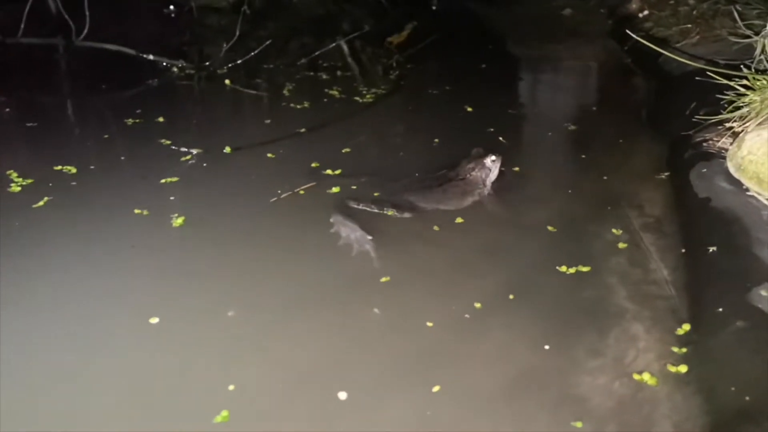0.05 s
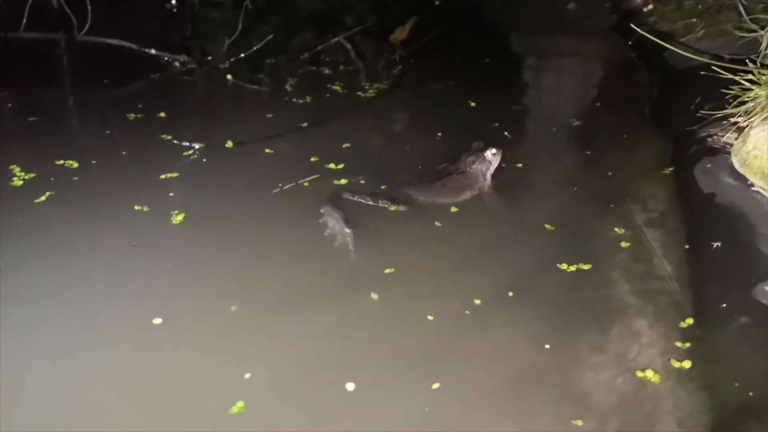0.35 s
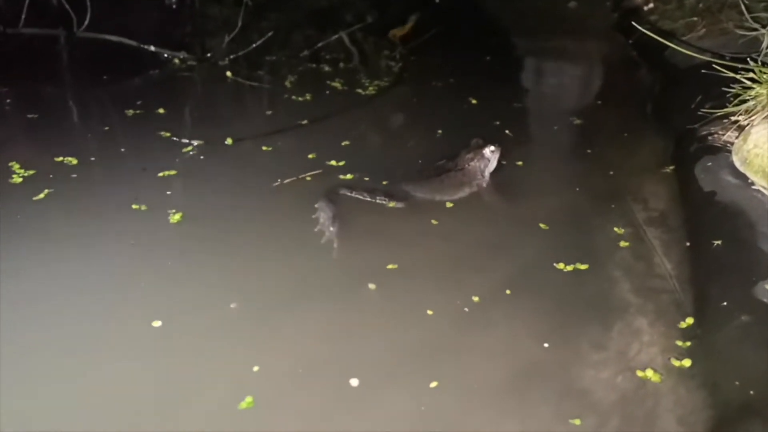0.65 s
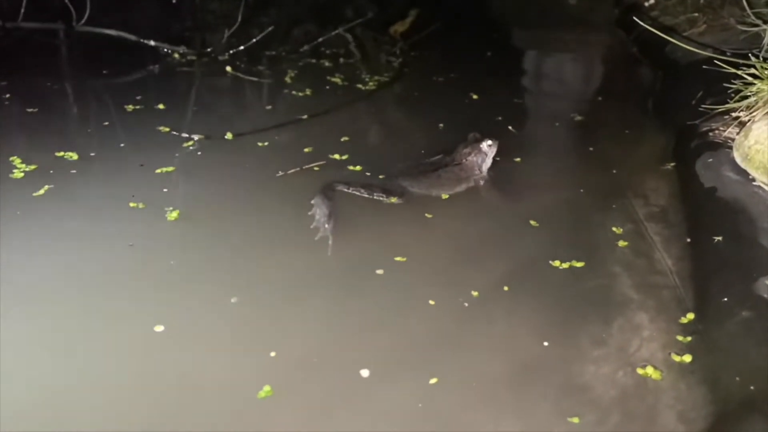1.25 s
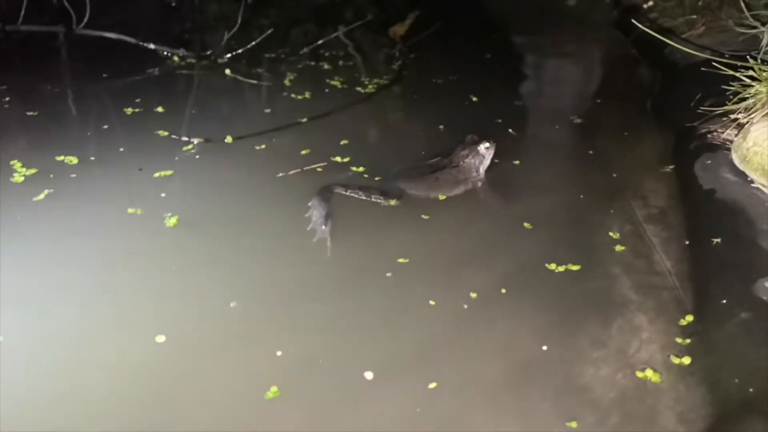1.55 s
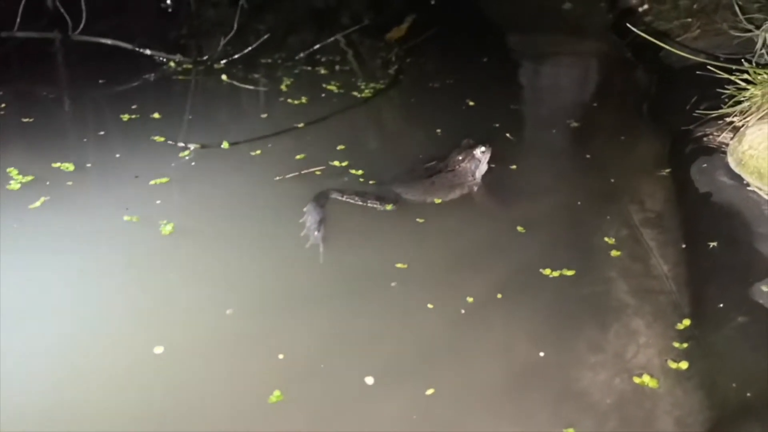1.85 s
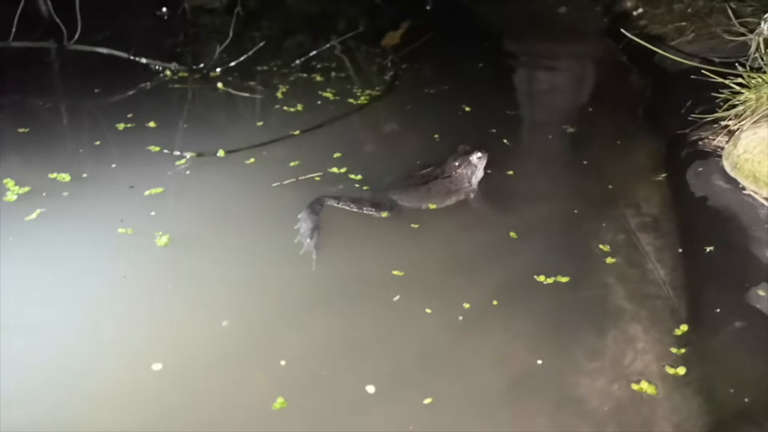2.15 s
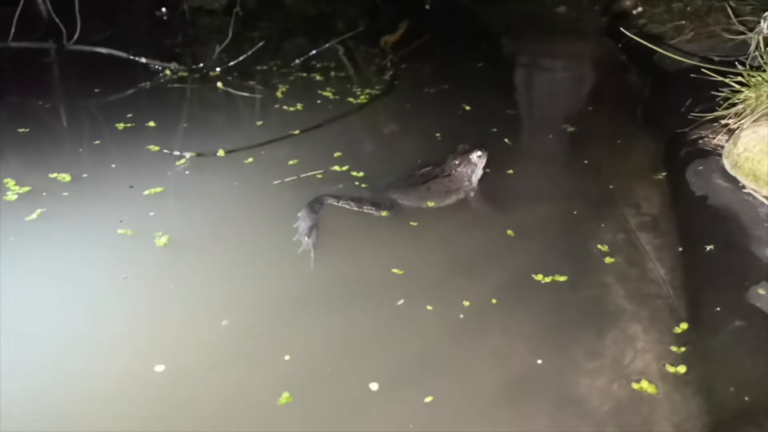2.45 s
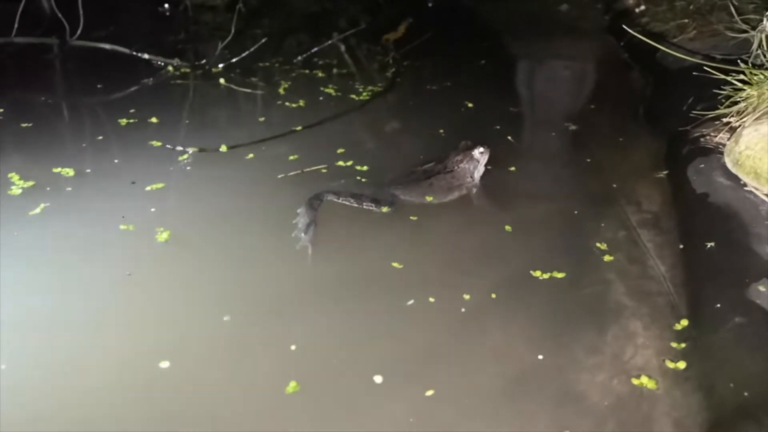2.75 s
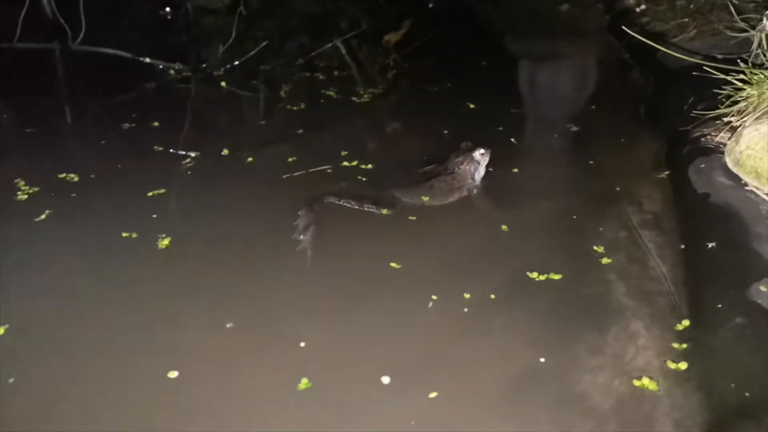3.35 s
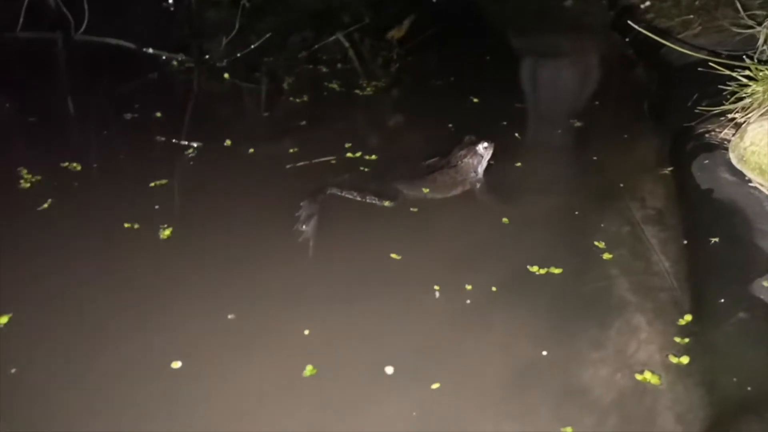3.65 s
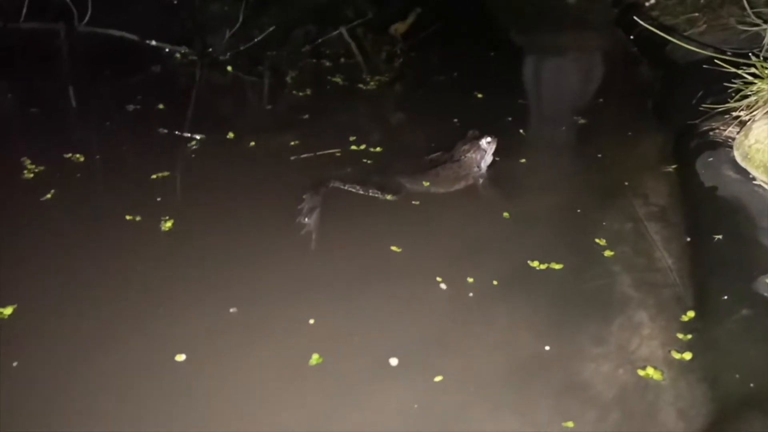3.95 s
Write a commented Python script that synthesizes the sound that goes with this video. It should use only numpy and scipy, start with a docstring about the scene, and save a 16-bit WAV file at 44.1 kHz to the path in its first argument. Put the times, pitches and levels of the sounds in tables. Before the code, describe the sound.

Frogs croak in low, purring pulses at a night pond. From about 0.5 to 1.1 seconds a near frog swells and quickens. Distant frogs answer faintly until 1.8 seconds. After a pause, a second near frog starts at 3.3 seconds, its slower pulses gaining speed and strength until 4 seconds, with faint frogs behind. A soft machinery hum, far traffic and a very faint rising engine run throughout.

```python
"""Frogs purr in a garden pond at night, each croak a train of short, ringing throat pulses.
A near frog swells and speeds up, distant frogs answer faintly in overlapping trains, then a second
near frog starts. The banks of the pond add a low, lingering ring and scatter a short, weak echo.
Underneath lie a low machinery hum, the dark hiss of night air and far traffic,
and a distant engine that slowly climbs in pitch."""
import sys
import numpy as np
from scipy import signal
from scipy.fft import rfft, irfft
from scipy.io import wavfile
from scipy.ndimage import uniform_filter1d

SR = 44100
rng = np.random.default_rng(int(sys.argv[2]) if len(sys.argv) > 2 else 0)


def generate_wav(signal):
    """Clip the signal to [-1, 1] and save it as 16-bit WAV at the path in sys.argv[1]."""
    frames = np.transpose(np.atleast_2d(signal))
    scaled = np.clip(frames, -1, 1) * 32767
    pcm = np.round(scaled).astype(np.int16)
    wavfile.write(sys.argv[1], SR, pcm)


N = 176400


def gain_of(db):
    """Decibels to gain."""
    return 10 ** (np.asarray(db) / 20)


def unit_rms(x):
    """Scales a signal to rms 1."""
    return x / np.sqrt(np.mean(x ** 2) + 1e-20)


def add(mix, start_s, sound):
    """Mixes a sound in at start_s."""
    part = mix[round(start_s * SR):][:len(sound)]
    part += sound[:len(part)]


def drift(rate_hz):
    """Smooth random modulation of rms 1, rolling off above rate_hz."""
    hz = np.fft.rfftfreq(N, 1 / SR)
    return unit_rms(irfft(rfft(rng.standard_normal(N)) * np.exp(-(hz / rate_hz) ** 2), N))


def machinery_hum(waver=0.17, stray_rad=0.41):
    """Distant machinery drones in low tones that waver in strength and phase."""
    # hum tones: pitch_hz, drift_hz, level_db
    tones = [(64.5, 4.5, -51), (72.1, 6.6, -61), (108.6, 6.3, -55.5), (119.76, 8.1, -59.5),
             (139.7, 9.7, -62.5)]
    t = np.arange(N) / SR
    out = np.zeros(N)
    for pitch_hz, drift_hz, level_db in tones:
        strength = 1 + waver * drift(drift_hz)
        phase = 2 * np.pi * pitch_hz * t + stray_rad * drift(drift_hz)
        out += gain_of(level_db) * unit_rms(strength * np.sin(phase))
    return out


def far_engine(flutter=0.31, flutter_hz=8):
    """One faint, climbing engine tone that flutters on its way through the air."""
    # the engine's glide: time_s, pitch_hz, level_db
    glide = [(0, 229, -74), (.45, 233, -57), (0.901, 241, -54.5), (1.199, 245.3, -72.5), (1.749, 255, -64),
             (2.1, 257.6, -77), (2.451, 267, -63.5), (2.9, 272.8, -64), (3.25, 265, -69.5),
             (3.421, 316, -62.5), (3.7, 313, -58), (4, 306, -74)]
    time_s, pitch_hz, level_db = np.transpose(glide)
    t = np.arange(N) / SR
    strength = gain_of(np.interp(t, time_s, level_db)) * (1 + flutter * drift(flutter_hz))
    phase = 2 * np.pi * np.cumsum(np.interp(t, time_s, pitch_hz)) / SR
    return strength * np.sin(phase)


def night_air(level_db=-53.5, patchy_db=1.04):
    """Still air and far traffic: a bed of dark noise with slightly drifting patches."""
    # tone colour of the bed: frequency_hz, relative_db
    colour = [(20, -2), (32, 2), (44, -9), (68, 2.5), (88, 1.5), (125, -3), (170, -2.5), (230, -7.5),
              (320, -13.5), (480, -16), (800, -21), (1300, -27), (1800, -27), (2700, -31), (3200, -36.5),
              (4100, -40.5), (5400, -42.5), (8200, -50.5), (12000, -51.5), (15000, -50)]
    frequency_hz, relative_db = np.transpose(colour)
    hz = np.fft.rfftfreq(2048, 1 / SR)
    colour_db = np.interp(np.log(hz + 1), np.log(frequency_hz), relative_db)
    real, imag, patches = rng.standard_normal((3, N // 512 + 5, len(hz)))
    patches = uniform_filter1d(patches, size=10, axis=0)  # smooth in time
    patches = unit_rms(uniform_filter1d(patches, size=16, axis=1))  # and across frequency
    spectra = (real + 1j * imag) * gain_of(colour_db + patchy_db * patches)
    noise = signal.istft(spectra.T, nperseg=2048, noverlap=1536)[1][:N]
    return gain_of(level_db) * unit_rms(noise)


def croak(pulses, resonances, trim_db, lead_s=.0032, puff_db=-40.5, puff_s=.002, puff_hz=2810):
    """Each pulse opens with a soft puff of air and sets off resonances that swell and die."""
    out = np.zeros(N)
    t = np.arange(2048) / SR
    soften = signal.butter(N=6, Wn=puff_hz, fs=SR)
    puff_shape = t / puff_s * np.exp(1 - t / puff_s)
    for crest_s, pulse_db, pitch_ratio in pulses:
        ring = np.zeros(len(t))
        for pitch_hz, mode_db, rise_ms, tightness in resonances:
            age = t * 1000 / rise_ms
            swell = (age * np.exp(1 - age)) ** tightness  # high tightness: dies as fast as it swells
            ring -= gain_of(mode_db) * swell * np.sin(2 * np.pi * pitch_hz * pitch_ratio * t)
        puff = unit_rms(signal.lfilter(*soften, rng.standard_normal(len(t)))) * puff_shape
        add(out, crest_s - lead_s, gain_of(pulse_db + trim_db) * (ring + gain_of(puff_db) * puff))
    return out


def first_frog():
    """A near frog whose throat pulses swell and quicken into a purr."""
    # throat pulses: crest_s, relative_db, pitch_ratio
    pulses = [(.5368, -43, 0.94), (.568, -44.5, 1.15), (.6132, -38, 0.98), (.6561, -37.5, 0.83),
              (.6928, -36, 0.96), (.7284, -33.5, 0.95), (.763, -30, .93), (.7963, -26.5, .95),
              (.8295, -27, .96), (.8617, -24, .97), (.8933, -23, 0.98), (.9257, -21, .985),
              (.9573, -22.5, 1.01), (.9888, -23.5, 1.005), (1.0188, -22.5, 1.03), (1.0474, -21.5, 1.02),
              (1.0758, -24.5, 1.006)]
    # throat resonances plus a low, lingering ring from the pond's banks:
    # pitch_hz, relative_db, rise_ms, tightness
    resonances = [(545, 1.5, 2.49, 4.4), (482, -8.5, 4.84, 6.9), (763, -6.5, 1.21, 1.7),
                  (1620, -31, 2.9, 2.6), (2520, -44.5, 1.4, 2.4), (415, -28, 23, 11), (273, -29, 14.5, 7)]
    return croak(pulses, resonances, trim_db=0.05)


def faint_frogs():
    """Fainter, distant frogs answer with overlapping pulse trains and return behind the second frog."""
    # throat pulses: crest_s, relative_db, pitch_ratio
    pulses = [(1.1778, -54, 1), (1.2136, -47.5, 0.86), (1.2465, -47.5, 0.77), (1.2615, -47.5, 1.01),
              (1.2817, -52, 1.03), (1.3025, -47, 0.8), (1.3176, -46, 0.76), (1.335, -46, 0.99),
              (1.3514, -43.5, 0.76), (1.373, -46.5, 1.01), (1.3891, -41.5, 0.88), (1.4211, -42.5, 0.98),
              (1.437, -42, 0.82), (1.4538, -43, 1), (1.4858, -42.5, 0.88), (1.5179, -41.5, 0.95),
              (1.5501, -41.5, 0.93), (1.5835, -46, 0.93), (1.6182, -43, 0.96), (1.6534, -43, 0.97),
              (1.6891, -45.5, .99), (1.7267, -43.5, 0.96), (1.7746, -50, 0.92), (3.4766, -48, .85),
              (3.5702, -49, 0.84), (3.6422, -44, 0.53), (3.7014, -52, .82), (3.7553, -50, 0.93),
              (3.816, -39, .92), (3.8694, -40, 1), (3.9193, -37.5, 1.13), (3.9682, -40.5, 1.2)]
    # throat resonances: pitch_hz, relative_db, rise_ms, tightness
    throat = [(511, 1.5, 2.94, 3.3), (416, -20, 7.6, 3.1)]
    return croak(pulses, throat, trim_db=-2.5)


def second_frog():
    """Another near frog, with slower throat pulses that gather speed and strength."""
    # throat pulses: crest_s, relative_db, pitch_ratio
    pulses = [(3.3511, -31.5, 1.02), (3.4448, -30.5, 0.94), (3.5361, -28, 0.99), (3.6083, -23.5, 1),
              (3.6696, -22.5, 0.99), (3.7316, -21, 1.016), (3.7872, -20, 1.004), (3.8404, -20.5, 1.015),
              (3.8923, -20, 1.017), (3.9421, -19.5, 1.005), (3.9889, -19.5, 1.02)]
    # throat resonances: pitch_hz, relative_db, rise_ms, tightness
    throat = [(552, -0.05, 3.46, 4.5), (501, -6.1, 5.97, 7.8), (460.6, -8.5, 4.36, 1.23),
              (1090, -26.5, 1.83, 2.1), (1730, -33, 1.5, 1.9), (2690, -34, 0.89, 3.4)]
    return croak(pulses, throat, trim_db=-1.2)


def bank_echoes(source, level_db=-30.5, t60_s=.12, predelay_s=.005):
    """Stones and plants on the banks scatter a short, weak echo."""
    t = np.arange(SR // 4) / SR
    tail = rng.standard_normal(len(t)) * gain_of(-60 * t / t60_s) * (t > predelay_s)
    return gain_of(level_db) * signal.fftconvolve(source, tail / np.linalg.norm(tail))[:N]


def scene():
    """The frogs and their echoes over the night bed, in mono."""
    frogs = first_frog() + second_frog() + faint_frogs()
    return (frogs + bank_echoes(frogs) + machinery_hum() + far_engine() + night_air())[None]


def record(dry, cutoff_hz=15600):
    """A steep low-pass trims the highest treble."""
    lowpass = signal.firwin(511, cutoff_hz, window=("kaiser", 9), fs=SR)
    return signal.oaconvolve(dry, lowpass[None], "same")


dry = scene()
out = record(dry)
generate_wav(out)
```